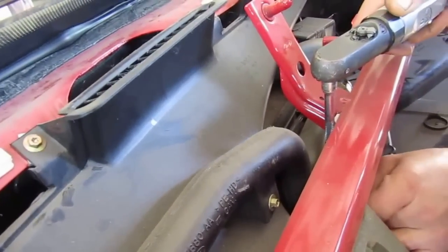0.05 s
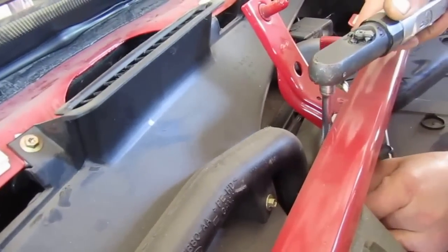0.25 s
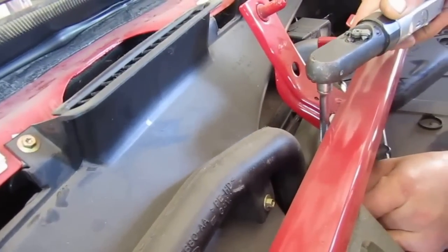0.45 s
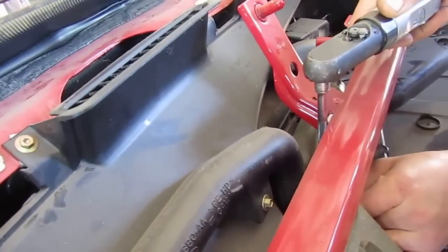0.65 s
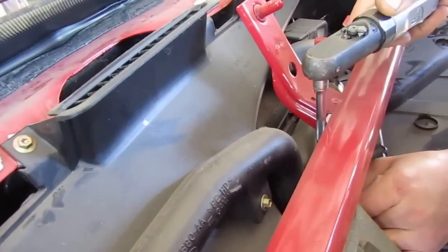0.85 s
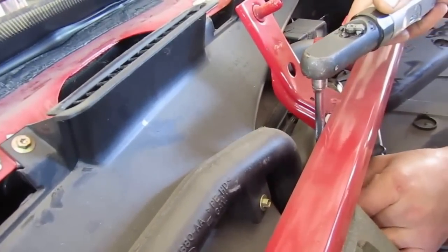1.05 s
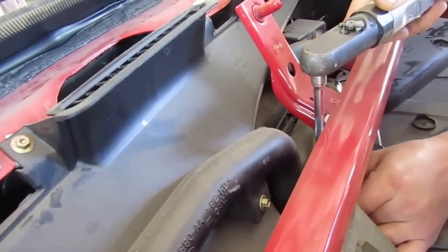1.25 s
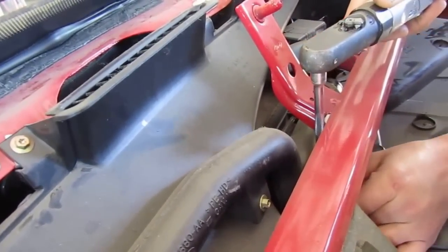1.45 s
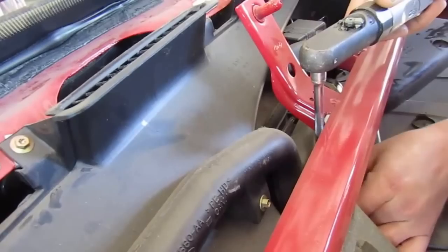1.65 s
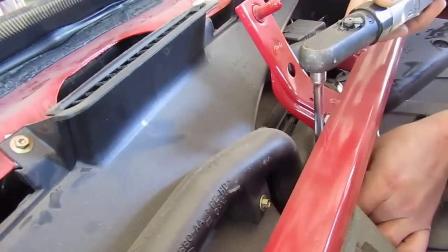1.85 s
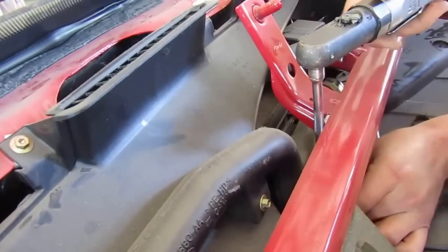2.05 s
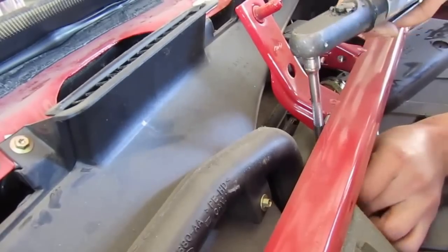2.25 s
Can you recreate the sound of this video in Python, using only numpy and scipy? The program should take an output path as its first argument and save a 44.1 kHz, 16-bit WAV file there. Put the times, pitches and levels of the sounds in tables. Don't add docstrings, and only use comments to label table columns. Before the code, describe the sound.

An air ratchet runs close by in a fairly dry workshop. Low shop murmur and soft hand and tool knocks come first. At 0.22 seconds the trigger cracks open; bright, dense hissing and a rapidly rising whine hold steady over a low buzzing drum. Around 1.99 it cuts off, chirping downward with bumps, then loose steel clinks until about 2.2, leaving a very quiet background and faint ringing.

```python
import sys
import numpy as np
from scipy import signal
from scipy.fft import rfft, irfft, next_fast_len
from scipy.io import wavfile
from scipy.ndimage import uniform_filter1d, map_coordinates

SR = 44100
rng = np.random.default_rng(int(sys.argv[2]) if len(sys.argv) > 2 else 0)


def nominal_scale(level):
    x = np.asarray(level, float) / 20
    return 10 ** x


def wav_record(signal):
    frames = np.transpose(np.atleast_2d(signal))
    bounded = np.clip(frames, -1, 1)
    quanta = np.round(bounded * 32767).astype(np.int16)
    wavfile.write(sys.argv[1], SR, quanta)


N = 101429
T = np.arange(N) / SR

# frequency in Hz, density in dB per Hz.
SHOP_SPECTRUM = [(20, -16), (110, -6.5), (200, -20.5), (800, -27.5), (1300, -20), (1550, -29), (1900, -41),
                 (15000, -64)]
# frequency in Hz, density in dB per Hz.
LATE_SPECTRUM = [(30, -7), (300, -7), (900, -16), (2000, -19), (3100, -24.5), (9900, -18), (11500, -25),
                 (15500, -49.5)]
# frequency in Hz, level in dB, flutter in dB.
MACHINE_HUM = [(108, -39.5, 2), (11800, -74, 2), (9560, -72, 4)]
# start in seconds, frequency in Hz, level in dB.
FAR_RING = (2.25, 740, -65)
# start in seconds, frequency in Hz, level in dB, t60 in seconds.
BAR_RING = (2.0, 2153, -43, .9)
# frequency in Hz, t60 in seconds.
ROOM_T60 = [(200, 0.23), (2000, 0.29), (10000, 0.068)]

KNOCK_S = [.0305, .042, .05, .078, .2175, .2255, 1.985, 2.005, 2.03]
# level in dB, frequency in Hz, t60 in seconds, scrape in dB.
KNOCKS = [(-26, 460, 0.054, 4.5), (-21, 210, 0.094, -7), (-24.5, 320, 0.045, -8.5), (-32, 58, .15, -34),
          (-16, 120, 0.041, -14), (-12.5, 2250, 0.024, 4), (-28.5, 203, 0.081, 3), (-29, 430, 0.17, -1),
          (-33, 57, 0.4, -19)]
# frequency in Hz, density in dB per Hz.
SCRAPE_SPECTRUM = [(80, -22), (250, 6.5), (600, 0.5), (1500, -11), (3500, -13), (5000, -26), (12000, -45),
                   (16000, -96.5)]
# frequency in Hz, density in dB per Hz.
PUFF_SPECTRUM = [(470, -43.5), (800, -8), (1140, -25.5), (1570, -1), (9100, -9.5), (16000, -40)]

# frequency in Hz, width in Hz,
# level in dB, time of the peak in seconds, duration in seconds.
SINGING_MODES = [(464, 21, -33, 0.39, .35), (635, 40, -35.5, 0.54, 0.18), (768, 28, -34, 0.4, 0.092),
                 (1545, 150, -29.5, .3, .08), (2316, 37, -36.5, 0.55, 0.13), (2276, 50, -36, 1.8, 0.51),
                 (4360, 40, -32, 0.88, 0.16), (5168, 40, -26.5, 0.77, 0.16), (5565, 40, -33.5, 0.78, 0.48),
                 (5740, 670, -23.5, 0.64, 0.14), (5980, 35, -38, 1.3, 0.42), (6800, 48, -27.5, 1.7, 0.41),
                 (7460, 90, -37.5, 0.49, 0.17), (9400, 60, -30, 1.05, .2)]
# start in seconds, peak in dB, lower edge in Hz, t60 in seconds.
TICKS = [
    (.068, -46, 6000, 0.044),
    (2.074, -27, 4500, .012),
    (2.0955, -27, 2600, .012),
    (2.176, -54.5, 5000, .015),
    (.2245, -17, 1500, 0.017),
]
# start in seconds, peak in dB, brightness of the high modes in dB,
# t60 in seconds.
CLINKS = [
    (2.024, -27.5, 11, 0.11),
    (2.044, -18.5, -16, 0.068),
    (2.074, -24, 3, 0.12),
    (2.079, -27.5, 6, 0.058),
    (2.0948, -17.5, -1, 0.069),
    (2.165, -26.5, -27, 0.062),
    (2.175, -36.5, -3.5, 0.057),
    (2.222, -46, -16, 0.055),
]
# frequency in Hz, level in dB, share of the t60 (ratio).
SOCKET_MODES = [(900, -4, .4), (1450, -1, .5), (2250, -1, .8), (3052, -8, .7), (4780, -6, .7),
                (5566, -3, 1.7), (6907, -7, .6), (8156, 1, .7), (8899, 0, .7), (10880, -15, .5),
                (13290, -15, .4)]

# time in seconds, flow in dB.
AIR_FLOW = [
    (0.226, -8),
    (0.288, -13.5),
    (0.602, -13),
    (0.758, -14),
    (1.298, -13.5),
    (1.987, -14.5),
]
# frequency in Hz, density in dB per Hz.
JET_SPECTRUM = [(30, -24), (100, -13), (250, -11.5), (450, -10), (900, -12), (3200, -8.5), (9700, -1.5),
                (15700, -12.5)]
# frequency in Hz, width in Hz, level over the jet in dB.
HOUSING_MODES = [(416, 98, 8.5), (1574, 890, 9), (2277, 165, 10.5), (4380, 660, 5), (4920, 160, -2),
                 (5280, 900, 2), (5980, 150, 5), (6650, 66, 7), (7280, 620, 3.5), (8400, 470, 1.5),
                 (9070, 250, 2.5), (9800, 380, 2), (10350, 1300, 1.5)]
# time in seconds, vane rate in Hz, whine level in dB.
MOTOR = [(.218, 500, -36), (.24, 1030, -27), (.268, 1620, -26), (.29, 1625, -35), (.6, 1622, -37),
         (.78, 1634, -27), (1.06, 1644, -26), (1.3, 1639, -26), (1.45, 1646, -23.5), (1.7, 1650, -23.5),
         (1.984, 1650, -25.5), (1.988, 1500, -30), (1.9925, 1330, -12), (1.998, 1200, -20),
         (2.0045, 1030, -11), (2.010, 800, -24), (2.025, 740, -27), (2.06, 650, -110)]
# multiple of vane rate, level in dB, time of the peak in seconds,
# duration in seconds.
WHINE_HARMONICS = [(2, -31.5, 0.253, 0.0194), (2, -30.5, 0.57, 0.5), (2, -32, 1.25, 0.25),
                   (2, -35, 1.87, 0.24), (3, -28.5, 0.5, 0.18), (3, -27, 1.33, 0.26), (3, -31, 1, .15),
                   (4, -32.5, 0.61, .1), (4, -28, 1.5, .22), (5, -27.5, 1.0, .22), (5, -32, 1.75, 0.29),
                   (6, -31, .47, 0.18), (6, -26, 1.3, 0.17), (6, -31, 3.6, 0.2)]
# delay in seconds, level in dB.
ECHOES = [(.0062, -7.5), (0.015, -12)]
# time in seconds, strokes per second, level in dB, panel boom on upper strokes in dB.
PAWL = [(.285, 92, -24.5, 4.5), (.305, 93.5, -27.5, 7), (.4, 94, -32, 9), (.44, 94.6, -29, -8),
        (.51, 94.6, -30.5, -1), (.66, 97, -30.5, 8.5), (.72, 94, -31.5, -4), (.78, 93.5, -32.5, 7),
        (.92, 93.7, -33.5, 8), (.96, 93.5, -37, 5.5), (1.07, 94.5, -30, 2), (1.19, 94, -31, -15),
        (1.27, 94, -31, -6), (1.42, 94.5, -31.5, -10), (1.5, 94.5, -36, 6.5), (1.78, 94, -35, -3),
        (1.85, 93, -37, 7.5), (1.98, 100, -34, -5)]
# multiple of stroke rate, level in dB, flutter in dB,
# share of the boom (ratio).
STROKE_HARMONICS = [(1, -.5, 1.2, 0.18), (2, -6.5, 2, 0.38), (3, -10.5, 2, 0), (4, 0, 2, 0.77),
                    (5, -11, 3.5, 0.41), (7, -19, 7, 0.91), (8, -16.5, 3.5, 1)]
# centre in seconds, low edge in Hz, high edge in Hz.
SIDE_NOISE = [(.262, 10900, 13200), (.375, 4100, 5200), (.42, 8200, 9700), (.513, 5100, 6300),
              (.513, 8200, 10400), (.513, 13000, 14500), (1.672, 8200, 9700), (1.72, 4100, 5200)]

OPEN_S, SHUT_S = 0.2191, AIR_FLOW[-1][0]
SHUT_DB_PER_S = 993


def unit(x):
    return x / np.sqrt(np.mean(x ** 2) + 1e-20)


def along(points, hz):
    f, v = np.transpose(points)
    return np.interp(np.log(hz + 1), np.log(f + 1), v)


def curves(rows):
    s, *columns = np.transpose(rows)
    return [np.interp(T, s, column) for column in columns]


def wobble(rate):
    knots = rng.standard_normal(int(N * rate / SR) + 4)
    return map_coordinates(knots, [T * rate])


def filtered(x, response):
    m = next_fast_len(N + SR // 2)
    return irfft(rfft(x, m) * response(np.fft.rfftfreq(m, 1 / SR)), m)[..., :N]


def noise(spectrum, patchy_db=-2.5):
    z = signal.stft(rng.standard_normal(N), nperseg=512)[2]
    field = uniform_filter1d(rng.standard_normal(z.shape), size=7, axis=0)
    field = uniform_filter1d(field, size=12, axis=1)
    x = signal.istft(z * nominal_scale(patchy_db * unit(field)), nperseg=512)[1][:N]
    return unit(filtered(x, lambda hz: nominal_scale(along(spectrum, hz))))


def turns(hz):
    return 2 * np.pi * np.cumsum(hz) / SR


def fade(start, db_per_s):
    return nominal_scale(-db_per_s * np.clip(T - start, 0, None))


def shop():
    hum = sum(nominal_scale(db + flutter * wobble(25)) * np.sin(2 * np.pi * hz * T) for hz, db, flutter in MACHINE_HUM)
    murmur = nominal_scale(-38 + 1.2 * wobble(30)) * noise(SHOP_SPECTRUM, patchy_db=1.5)
    early = (murmur + hum) * fade(OPEN_S, 400)
    late = nominal_scale(-61) * noise(LATE_SPECTRUM, patchy_db=1.5)
    s, hz, db = FAR_RING
    far = nominal_scale(db + 2 * wobble(30)) * np.clip((T - s) / 0.02, 0, 1)
    far = far * np.sin(turns(hz * (1 + 0.02 * wobble(20))))
    s, hz, db, t60 = BAR_RING
    bar = nominal_scale(db + wobble(30)) * (T > s) * fade(s, 60 / t60) * np.sin(2 * np.pi * hz * T)
    return early + late + far + bar


def room(x):
    hz, t, z = signal.stft(rng.standard_normal(SR // 2), SR, nperseg=256)
    decay = nominal_scale(-60 * t / along(ROOM_T60, hz)[:, None])
    tail = signal.istft(z * decay, SR, nperseg=256)[1]
    delayed = np.pad(x, (500, 0))
    return signal.fftconvolve(delayed, tail / np.linalg.norm(tail))[:N]


def handling():
    out, scrape = np.zeros(N), noise(SCRAPE_SPECTRUM)
    for s, (db, hz, t60, scrape_db) in zip(KNOCK_S, KNOCKS):
        t = np.clip(T - s, 0, None)
        envelope = nominal_scale(db - 60 * t / t60) * (1 - np.exp(-t / 0.0006))
        out += envelope * (np.sin(2 * np.pi * hz * t) + nominal_scale(scrape_db) * scrape)
    return out + nominal_scale(-35.5) * fade(0, 250) * noise(PUFF_SPECTRUM)


def singing():
    out = np.zeros(N)
    for hz, width, db, s, duration in SINGING_MODES:
        line = filtered(rng.standard_normal(N), lambda f: 1 / (1 + (2 * (f - hz) / width) ** 2))
        out += nominal_scale(db - 4.8 * ((T - s) / duration) ** 2) * unit(line)
    return out * (T > OPEN_S) * fade(SHUT_S, SHUT_DB_PER_S)


def ticks():
    out = np.zeros(N)
    for s, db, low_hz, t60 in TICKS:
        band = lambda f: 1 / (1 + (low_hz / (f + 1)) ** 4 + (f / 14200) ** 20)
        out += nominal_scale(db) * (T > s) * fade(s, 60 / t60) * filtered(rng.standard_normal(N), band)
    return out


def socket():
    out, t = np.zeros(N + SR), np.arange(SR // 2) / SR
    rise = 1 - np.exp(-t / 0.00063)
    for s, db, bright_db, t60 in CLINKS:
        for hz, level_db, share in SOCKET_MODES:
            rattle = signal.lfilter([0.01], [1, -1.8, 0.81], rng.standard_normal(len(t)))
            rattle *= nominal_scale(4.5 + 14 - 60 * t / t60)
            ring = nominal_scale(rng.normal(0, 3.0) - 60 * t / (t60 * share)) + rattle
            gain = nominal_scale(db - 14 + level_db + bright_db * (hz > 4200))
            out[round(s * SR):][:len(t)] += gain * rise * ring * np.sin(2 * np.pi * hz * t)
    return out[:N]


def valve():
    flow_db, = curves(AIR_FLOW)
    since = np.clip(T - OPEN_S, 0, None)
    opening = np.clip(since / 0.0045, 0, 1) ** 2
    burst = nominal_scale(-4 * np.exp(-since / 0.035))
    closing = np.maximum(fade(SHUT_S, SHUT_DB_PER_S), nominal_scale(-2.5) * fade(SHUT_S, 421))
    return nominal_scale(flow_db) * opening * burst * closing


def exhaust_jet(vane, stroke):
    def housing(f):
        power = sum(nominal_scale(2 * db) / (1 + (2 * (f - hz) / width) ** 2) for hz, width, db in HOUSING_MODES)
        return np.sqrt(1 + power)

    jet = unit(filtered(noise(JET_SPECTRUM, patchy_db=1.0), housing))
    jet *= (1 + 0.058 * np.sin(vane)) * (1 + 0.026 * np.sin(stroke))
    return jet * valve() * nominal_scale(0.16 * wobble(12.5) + 0.34 * wobble(70.1))


def pawl_drum(stroke, stroke_db, boom_db):
    on = np.clip((T - PAWL[0][0]) / 0.03 + 1, 0, 1)
    on = on * np.clip((PAWL[-1][0] - T) / 0.021 + 1, 0, 1)
    drum = sum(nominal_scale(db + share * boom_db + flutter * wobble(18)) * np.sin(k * stroke + rng.uniform(0, 6.8))
               for k, db, flutter, share in STROKE_HARMONICS)
    return nominal_scale(stroke_db) * on * drum


def motor_whine(vane, vane_hz, whine_db):
    rough_db = 1.5
    slow = np.clip((1620 - vane_hz) / 200, 0, 1)
    level_db = whine_db + 1.2 * wobble(40.16) + slow * rough_db * wobble(300)
    whine = nominal_scale(level_db) * np.sin(vane) * (T > OPEN_S)
    running = (vane_hz > 900) * (T < MOTOR[10][0])
    for k, db, s, duration in WHINE_HARMONICS:
        level_db = db - 9 * ((T - s) / duration) ** 2 + 2 * wobble(29.8)
        whine += nominal_scale(level_db) * np.sin(k * vane + 0.79 * wobble(40.3)) * running
    chirp = np.exp(-((T - 2.0025) / 0.0045) ** 2)
    whine += nominal_scale(-15.5 + rough_db * wobble(300)) * chirp * np.sin(2 * vane)
    echo = lambda f: sum(nominal_scale(db) * np.exp(-2j * np.pi * f * s) for s, db in ECHOES)
    return whine + filtered(whine * slow, echo)


def ratchet():
    vane_hz, whine_db = curves(MOTOR)
    stroke_hz, stroke_db, boom_db = curves(PAWL)
    vane = turns(vane_hz * (1 + 0.001 * wobble(30.2)))
    stroke = turns(stroke_hz * (1 + 0.0054 * wobble(15)))
    tones = motor_whine(vane, vane_hz, whine_db) + pawl_drum(stroke, stroke_db, boom_db)
    return exhaust_jet(vane, stroke) + np.sqrt(2) * tones


def scene():
    near = handling() + singing() + ticks() + socket() + ratchet()
    return np.tile(shop() + nominal_scale(-18.5) * room(near) + near, (2, 1))


def band_limit(x):
    return signal.sosfilt(signal.butter(12, 16430, fs=SR, output="sos"), x)


def record(dry):
    x = dry / (1 + np.abs(dry) ** 6) ** (1 / 6)
    x = filtered(x, lambda hz: 1 / (1 + (hz / 15750) ** 200))
    other = np.roll(x[0], -SR // 5)
    for s, low_hz, high_hz in SIDE_NOISE:
        window = np.sqrt(np.cos(np.pi * np.clip((T - s) / 0.05, -0.5, 0.5)).clip(0))
        band = filtered(other * window, lambda hz: (hz > low_hz) & (hz < high_hz))
        x = x + nominal_scale(-4) * band * [[1], [-1]]
    return band_limit(x)


dry = scene()
out = record(dry)
wav_record(out)
```